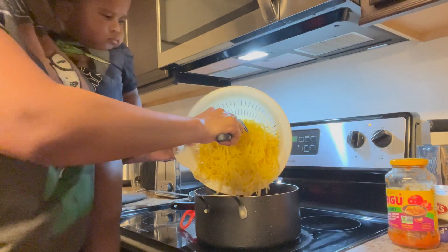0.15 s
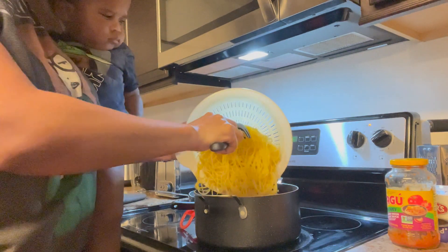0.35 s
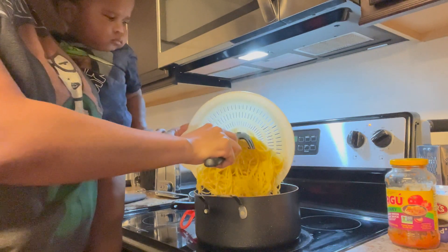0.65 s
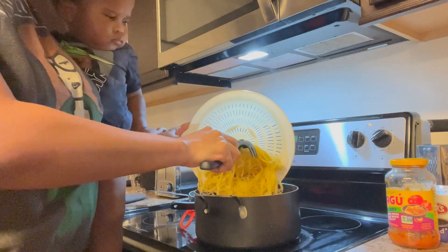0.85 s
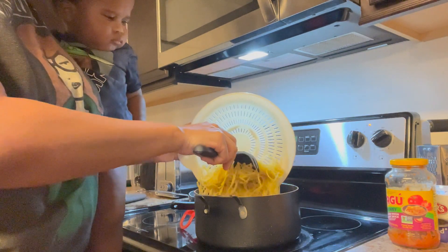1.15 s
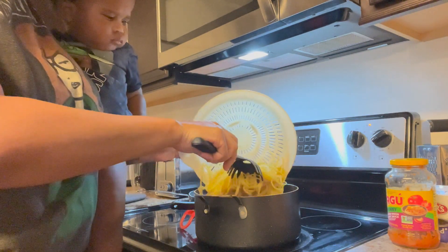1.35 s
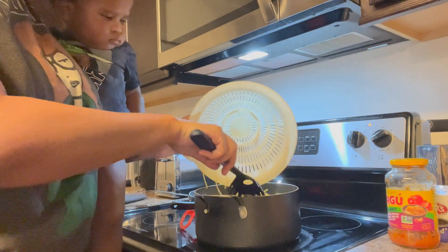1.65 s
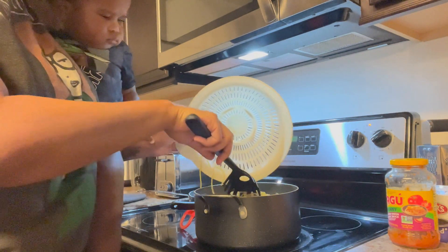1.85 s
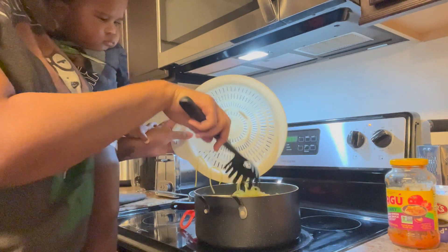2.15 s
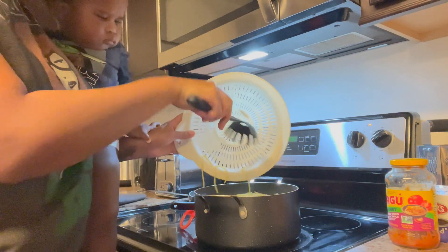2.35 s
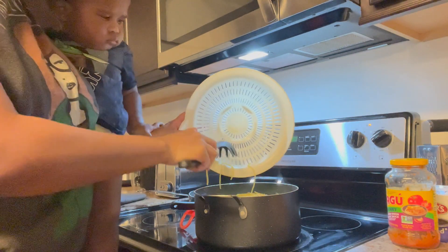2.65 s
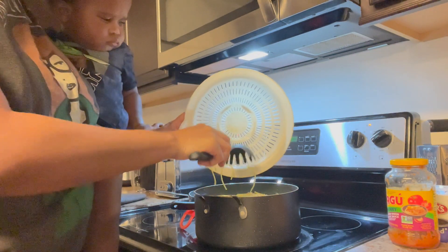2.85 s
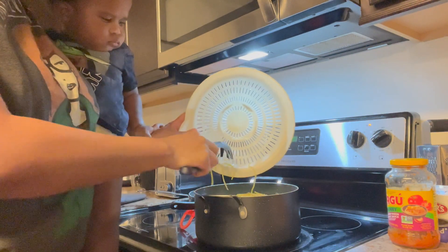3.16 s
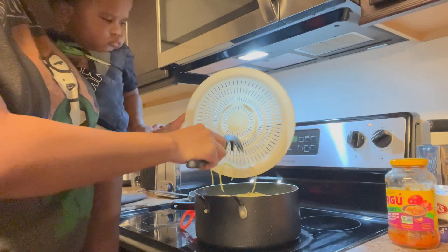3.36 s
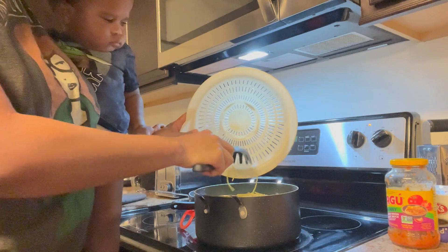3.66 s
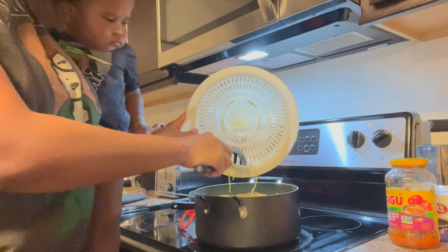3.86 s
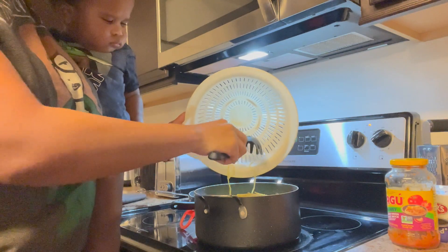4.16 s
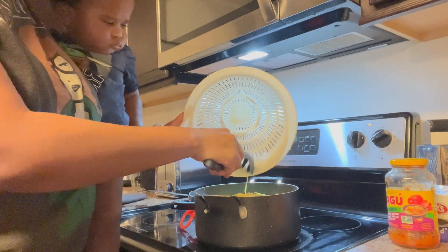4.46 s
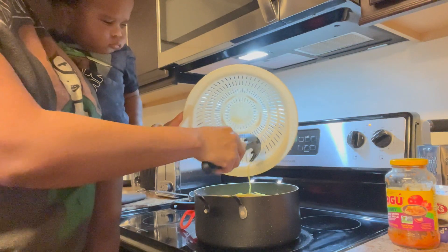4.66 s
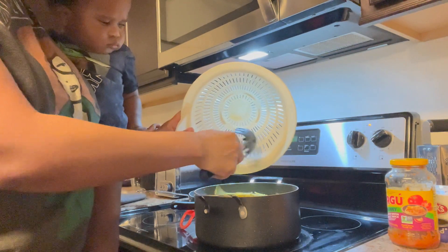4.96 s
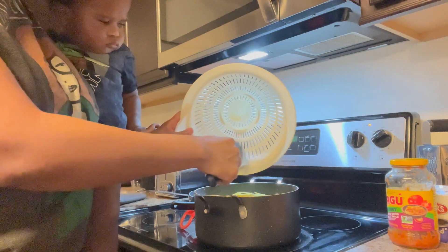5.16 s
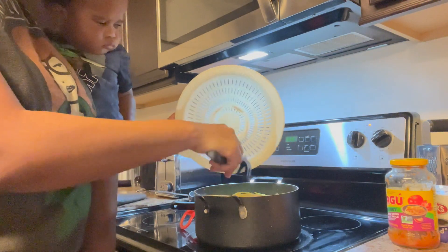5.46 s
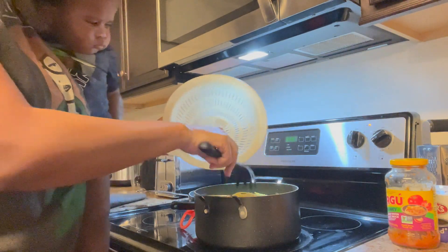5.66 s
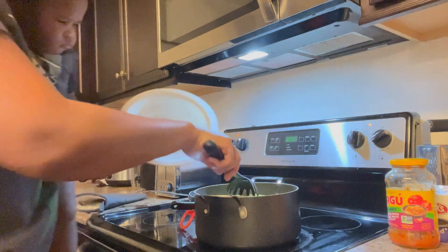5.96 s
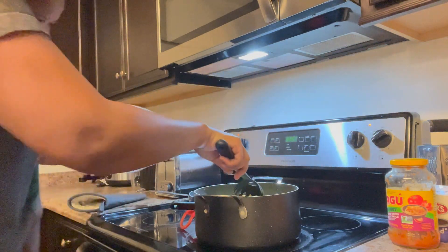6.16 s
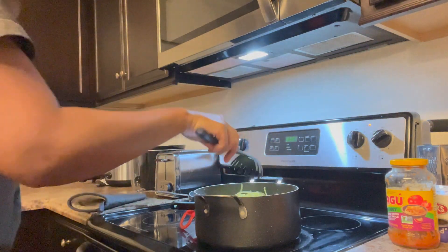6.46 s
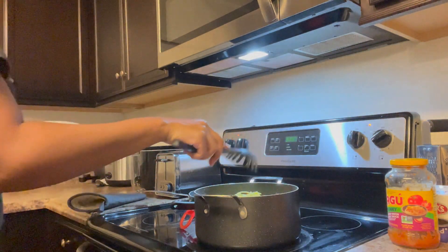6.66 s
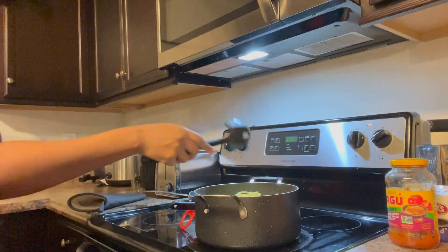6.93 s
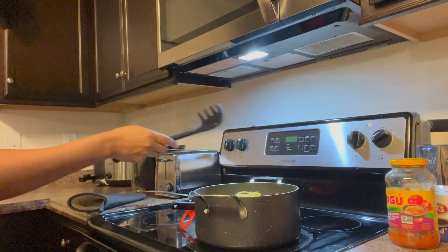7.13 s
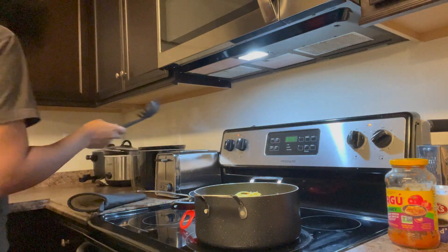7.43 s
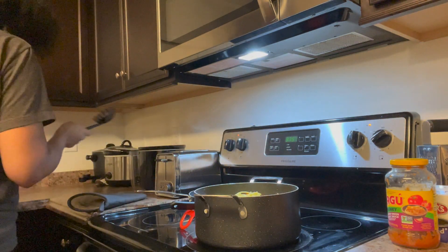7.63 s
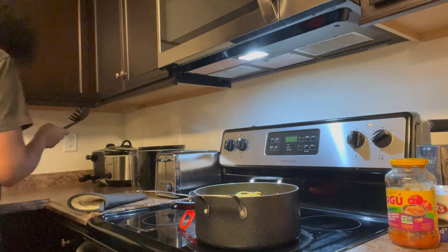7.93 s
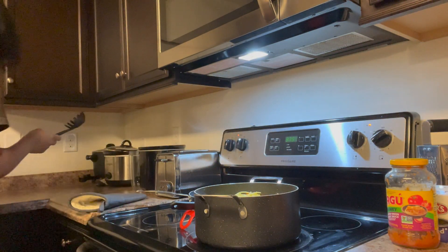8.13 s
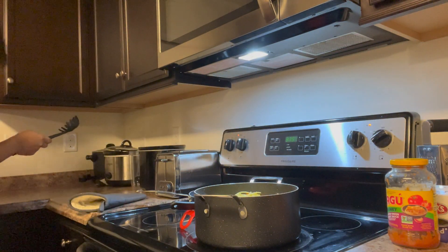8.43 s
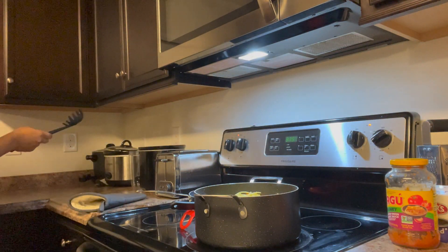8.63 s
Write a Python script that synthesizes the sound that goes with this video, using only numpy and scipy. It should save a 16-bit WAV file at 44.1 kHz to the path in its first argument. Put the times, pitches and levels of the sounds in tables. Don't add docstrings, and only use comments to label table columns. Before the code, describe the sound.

A low, steady cooker-hood hum with faint motor tones runs throughout a small, hard-surfaced kitchen, picked up closely in stereo. From 0.1 to 1.7 s there are only tiny, soft nudges of a server through noodles, with a slightly clearer click near 1.57. From 2.6 s crisp, hollow taps of tines on a plastic colander come in small clusters, around 2.7, 3.07, 3.5, 3.85, 4.3, 4.75 and 5.1, with short dry scrapes and a faint slide at 4.4. After 5.9 s the colander knocks and rubs, more busily from 6.9 to 8.1, with soft thuds beneath. Two sharper knocks and a scrape at 8.3 lead to a loud, bright crash at about 8.45: cutlery and a pan clatter in a steel basin, rattling and jingling until roughly 8.75, then fading into the room and hum.

```python
import sys
import numpy as np
from scipy import signal
from scipy.fft import rfft, irfft, next_fast_len
from scipy.io import wavfile

SR = 44100
rng = np.random.default_rng(int(sys.argv[2]) if len(sys.argv) > 2 else 0)


def master_out(mix):
    frames = np.transpose(np.atleast_2d(mix))
    ceiling = np.clip(frames, -1, 1)
    pcm = np.round(ceiling * 32767).astype(np.int16)
    wavfile.write(sys.argv[1], SR, pcm)


def voltage_ratio(level):
    return 10 ** (np.asarray(level, float) / 20)


N = 387638

# pitch_hz, level_db, t60_s
COLANDER_MODES = [(1330, -64, 0.025), (1580, 11, 0.05), (2024, -10, 0.066), (2390, -10, 0.13),
                  (2780, -18, 0.0082), (4380, -16, 0.025), (4540, -31, 0.015), (6570, -43, .02)]
MIDDLE_HARDNESS_DB = -17


def contacts():
    # start_s, peak_db, pitch_hz, treble_db, note_db (both re peak)
    nudges = [(0.1074, -50, 1330, -2, -20), (0.2094, -54, 1080, -5, -13), (0.3538, -53.5, 1580, -4, 1.5),
              (0.9348, -56, 1040, -16, -4), (1.074, -56.5, 5260, -2, -6), (1.386, -53, 2550, -28, 0),
              (1.391, -58, 1680, -6, 7), (1.389, -65, 3450, -15, 1), (1.474, -57, 3200, -29, -14),
              (1.526, -60, 2400, -36, -19), (1.5665, -42, 1500, -21, 6.5), (1.571, -52.5, 1390, -28, 17.5),
              (1.577, -58, 1500, -23, 12), (1.582, -57, 1400, -13, 20), (1.59, -60, 1210, -28, 19),
              (1.599, -64, 1090, -30, 16), (1.6075, -51, 1660, -16, 3), (1.62, -52.5, 2890, -3, 0),
              (1.568, -58, 4460, -10, 7), (1.6594, -48.5, 1690, -19, -8)]
    tines = [(2.595, -29.5, 1650, -16, -5.5), (2.6599, -38, 1600, -21, -21),
             (2.7078, -29.5, 3350, -24.5, -15), (2.7267, -28.5, 1640, -15.5, -1.5),
             (2.735, -44, 3640, -31, 4), (2.7443, -36.5, 3070, -7.5, 1), (2.752, -42, 2520, -22, 3),
             (2.597, -43, 3650, -15, -3), (2.728, -47.5, 3600, -15, 11.5), (2.73, -40, 1300, -21, 5),
             (3.0717, -23.5, 1580, -8.5, -16), (3.073, -40, 3800, -10, 2), (3.086, -48, 3120, -15, -4),
             (3.137, -57, 1490, -30, 5), (3.152, -51, 1470, -30, 2), (3.497, -34.5, 3740, -3, -2.5),
             (3.494, -25.5, 1580, -11.5, -7.5), (3.535, -34, 1580, -17, -15), (3.548, -43.5, 3080, -23, 5),
             (3.5551, -31.5, 1610, -19.5, -0.5), (3.8441, -21, 2220, -9, -5.5), (3.846, -38, 4060, 5, -8),
             (3.851, -33, 2520, -17, -3), (3.847, -35, 1580, -9, 7), (4.29, -44, 3900, -12, 5.5),
             (4.288, -26, 1330, -14, -14.5), (4.3887, -34.5, 1580, -16, -10),
             (4.7295, -35, 1600, -18.5, -8), (4.7734, -52.5, 5060, -6, 2), (4.844, -52, 2200, -29, -5),
             (5.0744, -36.5, 1610, -16, -10.5), (5.1158, -61, 1650, -18, 6), (5.137, -49, 3600, -15, -9),
             (5.152, -53, 3500, -22, -3), (5.165, -46, 2200, -26, -7), (5.18, -42, 2340, -32, -17),
             (5.2085, -36, 2780, -24, -7), (5.232, -55, 2500, -23, 3), (5.235, -51, 3270, -25, 4),
             (5.239, -59, 3700, -23, 5), (5.198, -50, 2300, -34, 0)]
    knocks = [(5.8965, -46, 1420, -16, -9), (5.9479, -48, 1970, -12, -4), (6.1075, -57, 5630, 14, -4),
              (6.1133, -51, 6000, -4, 6), (6.123, -50, 6100, -10, 6), (6.134, -52, 1910, -15, 8),
              (6.1445, -36, 2500, -4, -3), (6.517, -48.5, 1550, -1, -7), (6.676, -57, 1030, -8, 0),
              (6.882, -37, 3870, -20, -15), (6.8924, -36, 1460, -6, -7), (6.899, -34.5, 2220, -2, -10),
              (7.021, -43, 2340, -11, -4), (7.0923, -52, 1590, -19, -1), (7.2395, -35, 1960, -30, -14),
              (7.2514, -36, 2010, -4, -3), (7.3796, -35, 4050, 0.5, -12), (7.4585, -52, 4730, 18, -12),
              (7.47, -41, 2300, -19, -12), (7.51, -39, 1400, -31, -5.5), (7.551, -40, 3870, -38, -21),
              (7.7981, -28, 1990, -25, -8), (7.803, -39, 795, -42, 6), (7.9665, -33.5, 2430, -7, -10),
              (8.1224, -54, 1500, 3, -8), (8.3105, -27, 2520, -14, -12), (8.3394, -28, 2610, -3, -17)]
    kinds = [(nudges, (4.3, 0.19, -8)), (tines, (-13.5, 0.73, -8)), (knocks, (-7.5, 0.29, -1))]
    found = []
    for rows, (middle_db, loss, pan_db) in kinds:
        for s, peak_db, hz, treble_db, note_db in rows:
            knock_db = middle_db - loss * (treble_db - MIDDLE_HARDNESS_DB)
            found.append((s, peak_db, hz, treble_db, knock_db, note_db, pan_db))
    return found


def taps():
    snap_per_hardness = 0.049
    overtone_ratio, overtone_db, overtone_t60_s = 1.9, -29, 0.018
    next_tine_share, next_tine_spread = 0.35, 0.061
    direct, spread = np.zeros((2, N)), np.zeros(N)
    t = np.arange(round(.08 * SR)) / SR
    hz, level_db, t60 = np.transpose(COLANDER_MODES)[:, :, None]
    events = contacts()
    chance = rng.standard_normal((len(events), len(hz), 1))
    hiss = rng.standard_normal((len(events), len(t)))
    for event, luck, noise in zip(events, chance, hiss):
        s, peak_db, tine_hz, treble_db, knock_db, note_db, pan_db = event
        wall = np.sum(voltage_ratio(level_db + 3.0 * luck - 60 * t / t60) * np.sin(2 * np.pi * hz * t), axis=0)

        next_hz = tine_hz * (1 + next_tine_spread * np.sign(luck[0]))
        over_hz = overtone_ratio * tine_hz
        tine = np.sin(2 * np.pi * tine_hz * t) + next_tine_share * np.sin(2 * np.pi * next_hz * t)
        overtone = voltage_ratio(overtone_db - 60 * t / overtone_t60_s) * np.sin(2 * np.pi * over_hz * t)
        notes = voltage_ratio(-29.5) * wall + voltage_ratio(note_db) * (voltage_ratio(-60 * t / 0.027) * tine + overtone)

        crack = np.array([t == 0, 0.085 * noise * voltage_ratio(-60 * t / 0.09)])
        top_hz = np.clip(6497 - 900 * (peak_db + knock_db + 41.0), 6500, 15000)
        snap_top_hz = np.clip(4604 + 200 * (treble_db + 16.5), 2400, 4600)
        snap_db = 13.5 + snap_per_hardness * (treble_db - MIDDLE_HARDNESS_DB)
        snap = voltage_ratio(snap_db) * band(crack, 1120, snap_top_hz)
        edge = band(crack, 2270, top_hz)
        impulse, chatter = snap + voltage_ratio(treble_db + 5.0) * edge / np.abs(edge).max()

        bloom = voltage_ratio(note_db + 26.5) * band(crack[0], tine_hz / 1.07, tine_hz * 1.103)
        bloom = bloom + voltage_ratio(note_db + overtone_db + 4) * band(crack[0], over_hz / 1.3, over_hz)

        knock = band(noise * voltage_ratio(-60 * t / 0.071), 220, 1520)
        knock = voltage_ratio(knock_db) * knock / np.abs(knock).max()

        i = round(s * SR)
        pan = voltage_ratio([[pan_db / 2], [-pan_db / 2]])
        direct[:, i:i + len(t)] += voltage_ratio(peak_db - 5.0) * (impulse + chatter + knock + notes) * pan
        sent = 1.46 * impulse + knock + bloom + voltage_ratio(-31.5) * wall
        spread[i:i + len(t)] += voltage_ratio(peak_db - 7.5) * sent
    return direct, spread


def pot(knocks):
    # pitch_hz, level_db, t60_s
    pot_modes = [(2150, 0, .03), (2500, -4, .025), (3700, -6, .02), (4100, -5, .025)]
    total = 0
    for hz, level_db, t60 in pot_modes:
        total = total + voltage_ratio(level_db - 39) * (ring(knocks, hz, t60) + ring(knocks, hz * 1.1, t60))
    return total


def rubs():
    # freq_hz, level_db (per Hz)
    rub_spectrum = [(500, -34), (800, -30), (1300, -3.5), (2500, 0.5), (3800, -3.5), (6000, 0),
                    (10000, 3.5), (14500, 14.5)]
    # start_s, length_s, first_db, last_db, treble_db (re rub)
    strokes = [(1.378, .025, -78, -83, -30), (1.478, 0.035, -84, -86, -30), (2.73, 0.09, -73, -81, -22),
               (3.51, 0.1, -61, -70, -18), (3.87, 0.17, -62, -70, -18), (6.15, 0.032, -53, -62, -12),
               (1.57, 0.065, -64, -70, -15), (3.058, 0.0073, -70, -70, -15), (5.23, .008, -58, -65, -22),
               (2.616, 0.1, -60, -72, -21), (2.7, 0.052, -57, -67, -23), (4.73, 0.082, -60, -59, -6.5),
               (5.075, 0.15, -70, -73, -8), (5.149, 0.06, -60, -65, -7), (5.9, 0.074, -77, -69.5, -6),
               (6.113, 0.035, -59, -50, 0), (6.178, 0.28, -79, -80, -23), (6.521, 0.062, -64.5, -71, -9),
               (6.682, 0.066, -66.5, -77, -4), (6.883, 0.33, -56, -79.5, 0), (6.996, 0.044, -87, -66, 3),
               (7.243, 0.036, -55, -55.5, 9.5), (7.286, 0.064, -49.5, -51, 5), (7.39, 0.005, -56, -58, 3.5),
               (7.405, 0.044, -54, -55.5, 1), (7.462, 0.015, -51, -62.5, 11), (7.484, .045, -56, -57, 1),
               (7.539, 0.21, -59, -91, 1.5), (7.803, 0.13, -53.5, -74, -31), (7.928, 0.043, -70, -54, 0),
               (7.977, .03, -60, -63, -6), (8.02, 0.34, -65, -88, -16), (8.314, 0.087, -37, -50.5, -15)]
    flicker_db, flicker_hz = 0.8, 60
    slips = grains(per_s=2500, spread_db=3.2, size=(2, N))
    slips[1] = 0.16 * slips[0] + 1.35 * slips[1]
    tone = rms_one(colour(slips, rub_spectrum))
    wall = rms_one(sum(voltage_ratio(level_db) * ring(slips, hz, t60) for hz, level_db, t60 in COLANDER_MODES))
    low = rms_one(band(tone, 1100, 4940) + voltage_ratio(-44) * wall)
    high = -rms_one(band(tone, 4230, 10500))
    low = low * voltage_ratio(flicker_db * flicker(flicker_hz))
    high = high * voltage_ratio(flicker_db * flicker(flicker_hz))
    out = 0
    for s, length, first_db, last_db, treble_db in strokes:
        out = out + voltage_ratio(-2.5) * stroke(s, length, first_db, last_db) * (low + voltage_ratio(treble_db) * high)
    return out * voltage_ratio([[-1.5], [1.5]])


def slide():
    hiss = rng.standard_normal((2, N))
    tone = rms_one(band(hiss, 3740, 4460) + 2.0 * band(hiss, 1100, 1730))
    return stroke(s=4.41, length=0.273, first_db=-73, last_db=-70) * tone


def crash():
    # start_s, peak_db, pitch_hz (favoured by the struck spot)
    blow_rows = [(8.41, -31, 1330), (8.417, -31, 3070), (8.423, -9, 4750), (8.429, -22, 800),
                 (8.436, -37, 1480), (8.457, -5, 3040), (8.456, -2, 5400), (8.458, -10, 557),
                 (8.461, -15, 624), (8.484, -12, 1000), (8.53, -20, 5400), (8.6, -28, 5300),
                 (8.468, -8, 1320), (8.471, -12, 810), (8.471, -12, 2640), (8.479, -4.5, 1300),
                 (8.497, -14, 800), (8.506, -27, 7088), (8.513, -16, 2310), (8.526, -24, 870),
                 (8.541, -16, 3070), (8.552, -12, 5460), (8.565, -17, 780), (8.577, -31, 1710),
                 (8.597, -21, 770), (8.615, -35, 3100), (8.62, -15.5, 1330), (8.639, -34, 2360),
                 (8.689, -22, 1610), (8.697, -21.5, 1680), (8.694, -24, 4400), (8.581, -27, 1650),
                 (8.52, -35, 2320), (8.489, -25, 3000), (8.725, -26, 2270), (8.697, -25, 3630),
                 (8.712, -22.5, 780), (8.733, -38, 2310)]
    # start_s, rattle_db, jingle_db (re rattle)
    rattle_rows = [(8.4, -45, -25), (8.418, -24, -27), (8.426, -21, 5), (8.432, -23.5, 3),
                   (8.45, -23.5, 10), (8.462, -16, 5), (8.49, -19.5, 1), (8.52, -17.5, 11),
                   (8.544, -23.5, 17.5), (8.59, -25.5, 7), (8.634, -22.5, -24), (8.662, -28.5, -28),
                   (8.706, -29, -22), (8.79, -35, -43)]
    # pitch_hz, level_db, t60_s
    basin_modes = [(547, -5, 0.06), (603, -11, 0.17), (721, -9, 0.16), (774, -32, 0.079), (797, 2, 0.166),
                   (870, -7, 0.16), (1042, -7, 0.072), (1120, -24, 0.1), (1301, 0.5, 0.1),
                   (1492, -12.5, 0.17), (1640, -7, 0.12), (1732, -10, 0.13), (2186, -3.5, 0.077),
                   (2240, -9, 0.11), (2340, -1, 0.12), (2470, -8, 0.18), (2666, -2.5, 0.1),
                   (3066, -5, 0.027), (3050, -1.5, 0.069), (3370, -10, 0.11), (3810, -7.5, 0.027),
                   (4210, -16, 0.079), (4720, -18, 0.065), (5325, -6, 0.093), (5460, -22, 0.092),
                   (7088, -10, 0.09), (7580, -17, 0.078)]
    # pitch_hz, level_db, t60_s
    cutlery_modes = [(8700, -2, 0.05), (10300, -11, 0.023), (9100, -13, 0.046), (9720, 5, 0.1),
                     (9550, -1, .04), (10200, -24, .1), (11300, -13, .1), (10700, -7, 0.043),
                     (11000, -9, 0.05), (12000, -12, .05), (12350, -16, 0.085), (13200, -3.5, 0.045),
                     (13400, -14, 0.05), (13690, -10, 0.06)]
    # freq_hz, level_db (per Hz)
    clatter_spectrum = [(150, -32), (240, -28), (420, -15.5), (520, -13), (786, -0.5), (969, -16),
                        (1350, -5), (1820, -8), (5440, -21.5), (7340, -27), (7800, -38), (8400, -38),
                        (9000, -26), (9760, -24), (11400, -25), (12600, -22.5), (14400, -30)]
    # freq_hz, balance_db (left minus right)
    basin_balance = [(60, -10), (180, -5), (530, -4), (1580, -2), (4700, -12.5), (14000, -0.5)]
    spot_octaves, spot_floor_db = 0.22, -23.5
    start = round(8.25 * SR)
    rattle_db, jingle_db = (c[start:] for c in in_time(rattle_rows))
    blow_s, blow_db, spot_hz = np.transpose(blow_rows)
    fade = voltage_ratio(-60 / (0.026 * SR))

    def bursts(hz):
        blows = np.zeros(N - start)
        near = np.exp(-(np.log2(hz / spot_hz) / spot_octaves) ** 2)
        blows[(blow_s * SR).astype(int) - start] = voltage_ratio(blow_db + spot_floor_db * (1 - near))
        return signal.lfilter([1 - fade], [1, -2 * fade, fade ** 2], blows)

    def struck(modes, force, per_s, split=0.0058):
        total = 0
        for hz, level_db, t60 in modes:
            clicks = force(hz) * grains(per_s, 2.45, (2, N - start))
            low = ring(clicks[0], hz * (1 - split), t60)
            high = ring(clicks[1], hz * (1 + split), t60)
            sign = rng.choice([-1, 1]) if hz > 1800 else 1
            pair = np.array([low + 1.14 * high, 0.13 * low + high * sign])
            total = total + voltage_ratio(level_db) * rms_one(pair)
        return total

    basin = voltage_ratio(-33.5) * struck(basin_modes, lambda hz: bursts(hz) + voltage_ratio(rattle_db - 13.5), per_s=4000)
    cutlery = voltage_ratio(-44.5) * struck(cutlery_modes, lambda hz: voltage_ratio(rattle_db + jingle_db), per_s=2100)
    dense = grains(per_s=14000, spread_db=0.0, size=(2, N - start))
    dense[1] = 0.21 * dense[0] + 0.82 * dense[1]
    clatter_gain = voltage_ratio(rattle_db - 7.0) + voltage_ratio(5.5) * bursts(1778)
    clatter = clatter_gain * rms_one(colour(dense, clatter_spectrum))
    mix = basin + cutlery + clatter
    left = colour(mix[0], [(hz, db / 2) for hz, db in basin_balance])
    right = colour(mix[1], [(hz, -db / 2) for hz, db in basin_balance])
    return np.pad([left, right], ((0, 0), (start, 0)))


def counter():
    # start_s, thud_db, boom_db
    bumps = [
        (7.8, -46.5, -72),
        (8.0, -52.5, -76),
        (8.089, -57.5, -67),
        (8.293, -41.5, -44.5),
        (8.461, -39, -37.5),
        (8.53, -43, -57),
        (8.71, -43, -44),
    ]
    rise_s, thud_fall, boom_fall = 0.042, 123, 121
    boom, thud = rng.standard_normal((2, N))
    boom_gain = 0
    thud_gain = stroke(s=7.05, length=0.69, first_db=-59, last_db=-59)
    for s, thud_db, boom_db in bumps:
        age = np.maximum(np.arange(N) / SR - s, 0)
        rise = np.minimum(age / rise_s, 1)
        boom_gain = boom_gain + rise * voltage_ratio(boom_db - boom_fall * age)
        thud_gain = thud_gain + rise * voltage_ratio(thud_db - thud_fall * age)
    return band(voltage_ratio(30.5) * boom_gain * boom, 49, 100) + band(voltage_ratio(24.0) * thud_gain * thud, 212, 342)


def fan():
    # freq_hz, level_db (per Hz)
    air_spectrum = [(28, -44), (42, -2), (100, -7), (150, -9), (240, -11), (400, -7), (650, -13),
                    (1040, -27), (1400, -29), (1800, -25.5), (2300, -42.5), (4000, -49.5), (8000, -52.5),
                    (14500, -55)]
    # pitch_hz, width_hz, level_db
    duct_modes = [(180.4, 50, -64), (289.6, 21.5, -61), (361.8, 16, -61.5), (396.6, 13, -65.5)]
    # freq_hz, likeness (0-1)
    likeness = [(60, 0.98), (150, 0.91), (370, 0.6), (920, -0.23), (2270, -0.1), (5630, -0.19),
                (14000, 0.28)]
    # freq_hz, balance_db (left minus right)
    fan_balance = [(60, -1), (180, -0.5), (530, -3), (1580, -1), (4700, -6), (14000, 3)]
    hz = np.fft.rfftfreq(N, 1 / SR)
    mid, side = rfft(rng.standard_normal((2, N)))
    air = voltage_ratio(at_hz(air_spectrum, hz))
    power = voltage_ratio(-51.5) ** 2 * 0.61 * air ** 2 / np.mean(air ** 2)
    for tone_hz, width_hz, tone_db in duct_modes:
        peak = 1 / (1 + (2 * (hz - tone_hz) / width_hz) ** 2) ** 2
        power = power + voltage_ratio(tone_db) ** 2 * peak / peak.mean()
    alike = np.clip(1.397 * at_hz(likeness, hz) - .4, 0, 1)
    pair = np.sqrt(1 + alike) * mid + np.sqrt(1 - alike) * side * [[1], [-1]]
    pan = voltage_ratio(at_hz(fan_balance, hz) * [[.5], [-.5]])
    return irfft(np.sqrt(power / 2) * pair * pan, N)


def motor():
    # pitch_hz, level_db (rms)
    motor_tones = [(179, -61.5), (358, -61.5), (658, -72)]
    t = np.arange(N) / SR
    tones = 0
    for hz, level_db in motor_tones:
        tones = tones + voltage_ratio(level_db) * np.sqrt(2) * np.sin(2 * np.pi * hz * t + rng.uniform(0, 5.0))
    return tones * voltage_ratio([[-1.2], [1.2]])


def kitchen(x):
    # freq_hz, t60_s
    decay_times = [(500, 0.77), (1000, 0.28), (2000, 0.58), (4000, 0.56), (7000, 0.36), (12000, 0.32)]
    early_gap, build_s = 0.18, 0.053
    places, stay_s = 5, .11
    t = np.arange(round(.6 * SR)) / SR
    place = (np.arange(N) / SR // stay_s) % places
    source = x.mean(axis=0, keepdims=True)
    out = 0
    for k in range(places):
        echo = 0
        for hz, t60 in decay_times:
            noise = rng.standard_normal((2, len(t)))
            echo = echo + band(noise, hz / 1.49, hz * 1.425) * voltage_ratio(-60 * t / t60)
        echo = echo * np.clip(t / 0.00072, 0, 1) * (1 - early_gap * np.exp(-t / build_s))
        echo = echo / np.sqrt(np.sum(echo ** 2) / 2)
        out = out + signal.fftconvolve(source * (place == k), echo, axes=1)[:, :N]
    return out


def stroke(s, length, first_db, last_db):
    attack_s, release_s, edge_db = 0.016, 0.013, -35
    end = s + length
    return voltage_ratio(in_time([(s - attack_s, first_db + edge_db), (s, first_db), (end, last_db),
                        (end + release_s, last_db + edge_db)])[0])


def grains(per_s, spread_db, size):
    sizes = voltage_ratio(spread_db * np.minimum(rng.exponential(1, size), 4)) * rng.choice([-1, 1], size)
    return rms_one(sizes * (rng.random(size) < per_s / SR))


def ring(clicks, hz, t60):
    r, w = voltage_ratio(-60 / (t60 * SR)), 2 * np.pi * hz / SR
    return signal.lfilter([0, np.sin(w)], [1, -2 * r * np.cos(w), r * r], clicks + 1e-18)


def flicker(rate_hz):
    return rms_one(band(rng.standard_normal(N), rate_hz / 4, rate_hz))


def band(x, low_hz, high_hz):
    sos = signal.butter(2, [low_hz, min(high_hz, .45 * SR)], "band", fs=SR, output="sos")
    return signal.sosfilt(sos, x)


def colour(x, points):
    size = next_fast_len(x.shape[-1] + 4096)
    gain = voltage_ratio(at_hz(points, np.fft.rfftfreq(size, 1 / SR)))
    return irfft(rfft(x, size) * gain, size)[..., :x.shape[-1]]


def at_hz(points, hz):
    table_hz, values = np.transpose(points)
    return np.interp(np.log(np.maximum(hz, 1)), np.log(table_hz), values)


def in_time(rows):
    s, level_db, *rest = np.transpose(rows)
    t = np.arange(N) / SR
    return [np.interp(t, s, level_db, left=-150, right=-150)] + [np.interp(t, s, c) for c in rest]


def rms_one(x):
    return x / np.sqrt(np.mean(x ** 2) + 1e-20)


def scene():
    near, spread = taps()
    strokes = rubs() + slide()
    sink = crash()
    sent = voltage_ratio(1.0) * (spread + pot(spread)) + voltage_ratio(-5.0) * strokes + voltage_ratio(-7.0) * sink
    return fan() + motor() + counter() + near + strokes + sink + kitchen(sent)


def band_limit(x):
    return signal.sosfilt(signal.butter(12, 14570, fs=SR, output="sos"), x)


def record(dry):
    # freq_hz, level_db
    sum_response = [(100, -0.5), (6500, -0.5), (7250, -3), (7750, -12), (8250, -12), (8700, -6.5),
                    (9200, 0.5), (13500, 2), (14500, -23), (16000, -40)]
    # freq_hz, level_db
    difference_response = [(100, 3), (1000, 2), (4000, -0.5), (8000, 3), (9800, 4), (10600, -47),
                           (12500, -3), (13200, -5), (14500, 8.5), (16000, 18)]
    rounded = 0.88 * np.tanh(dry / 0.91)
    mid = colour(rounded[0] + rounded[1], sum_response) / 2
    side = colour(rounded[0] - rounded[1], difference_response) / 2
    return band_limit(np.array([mid + side, mid - side]))


dry = scene()
out = record(dry)
master_out(out)
```